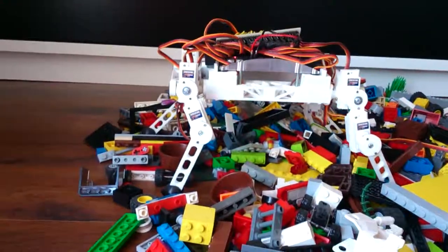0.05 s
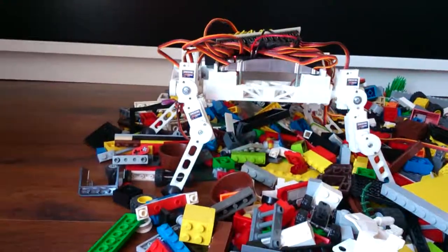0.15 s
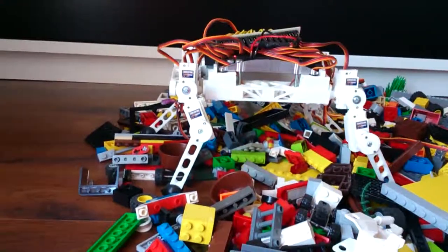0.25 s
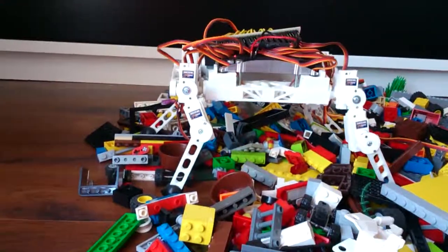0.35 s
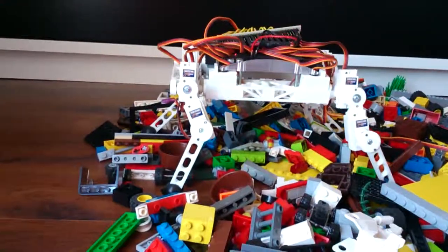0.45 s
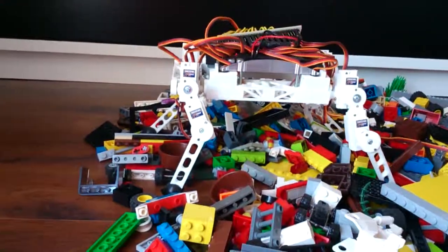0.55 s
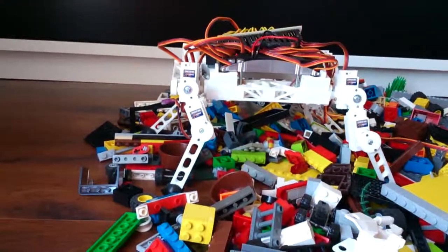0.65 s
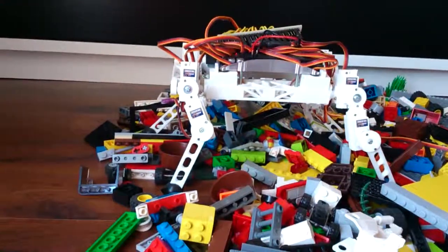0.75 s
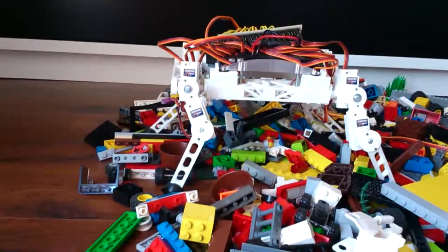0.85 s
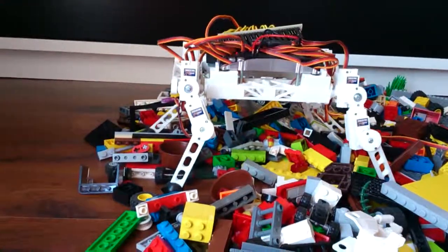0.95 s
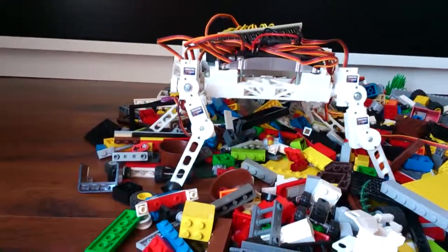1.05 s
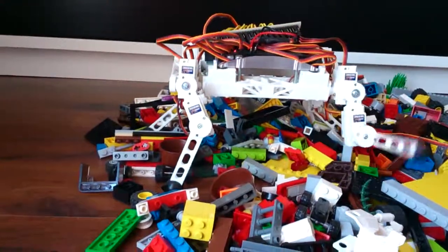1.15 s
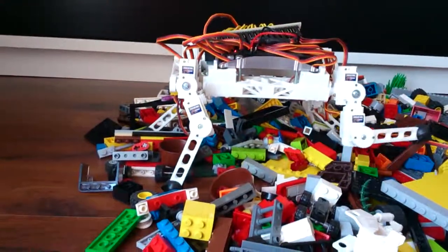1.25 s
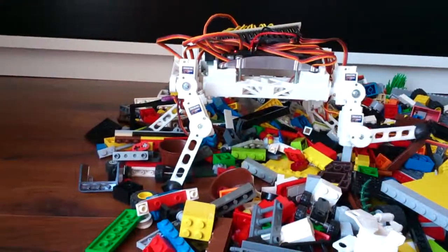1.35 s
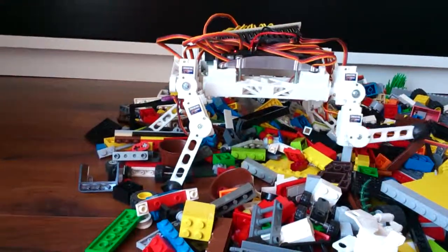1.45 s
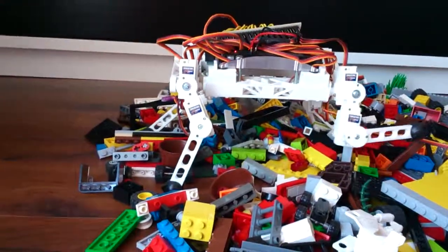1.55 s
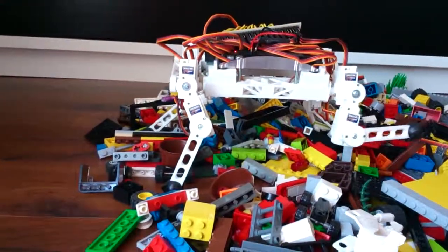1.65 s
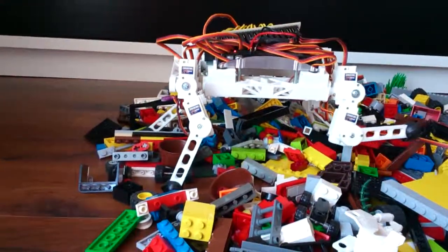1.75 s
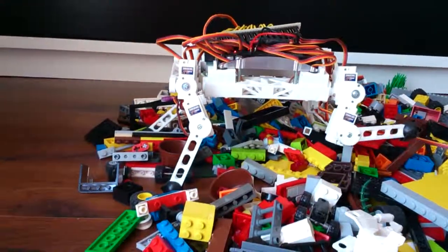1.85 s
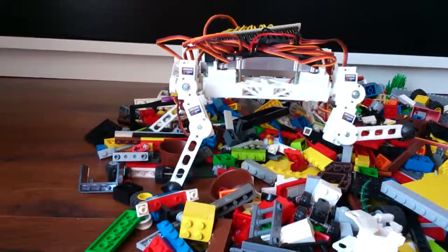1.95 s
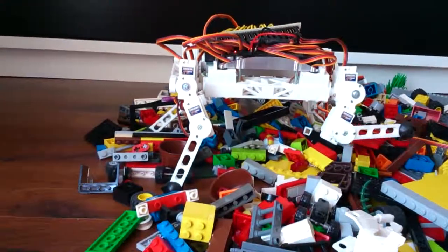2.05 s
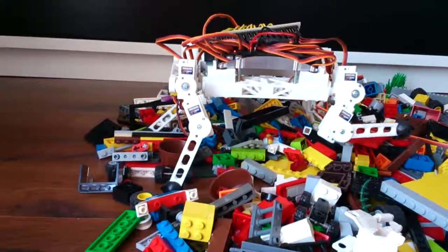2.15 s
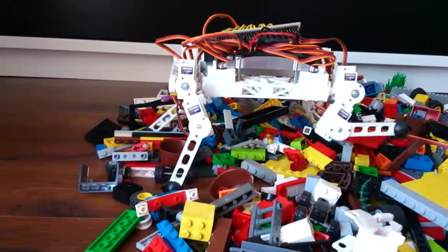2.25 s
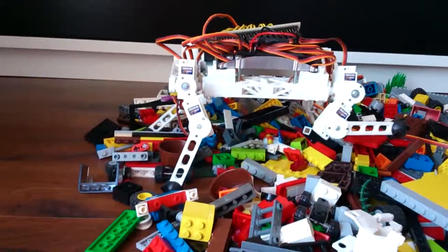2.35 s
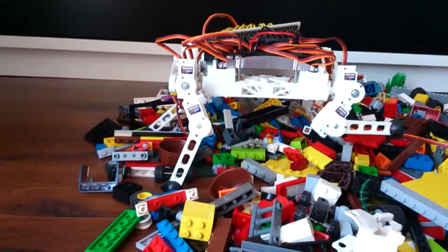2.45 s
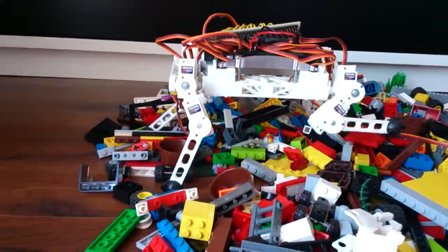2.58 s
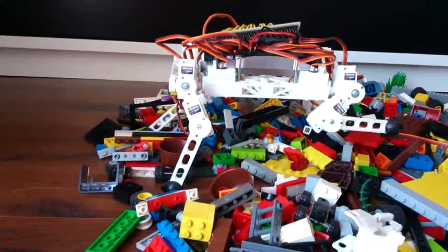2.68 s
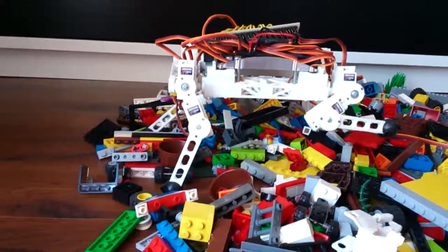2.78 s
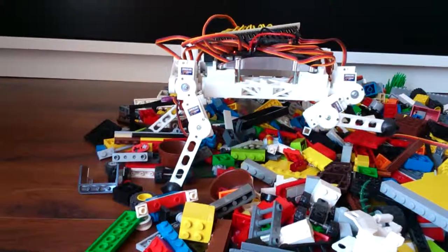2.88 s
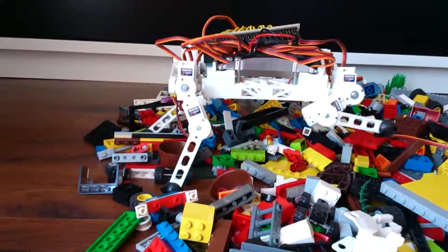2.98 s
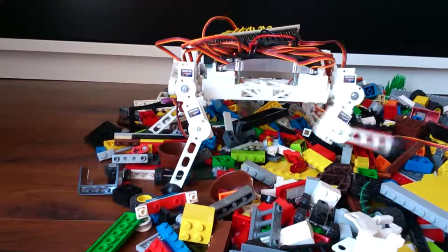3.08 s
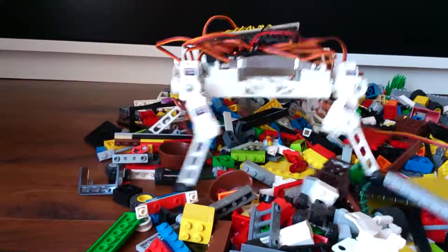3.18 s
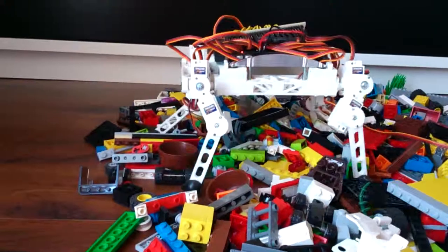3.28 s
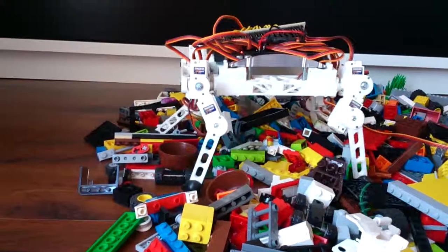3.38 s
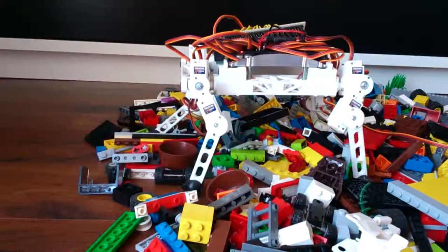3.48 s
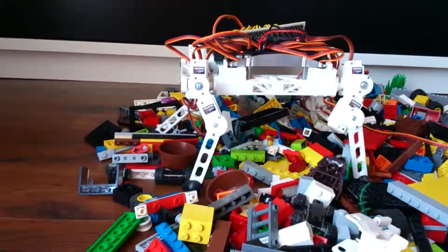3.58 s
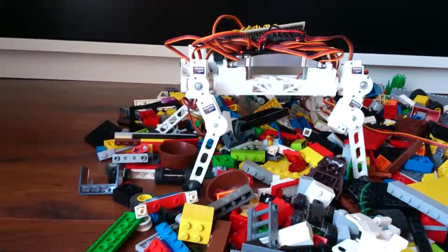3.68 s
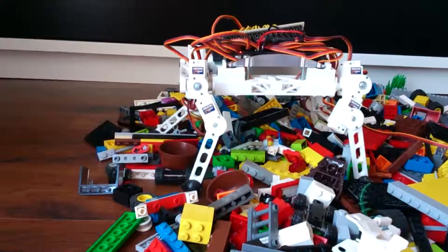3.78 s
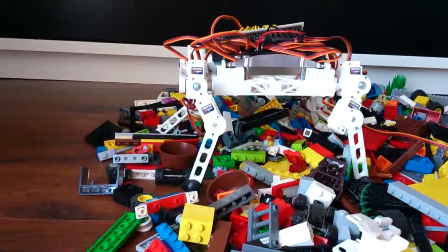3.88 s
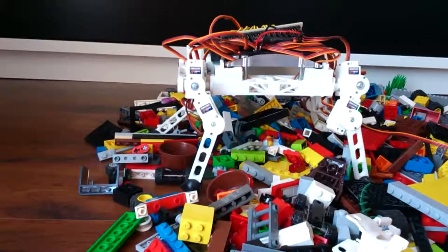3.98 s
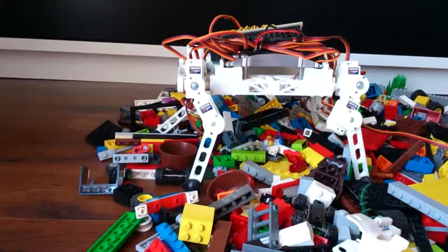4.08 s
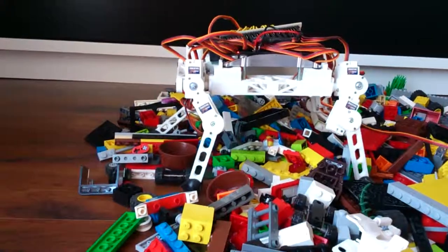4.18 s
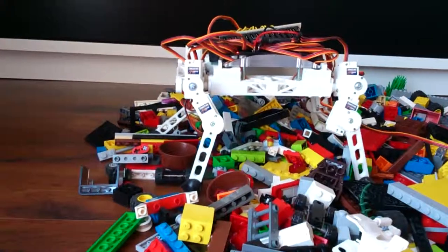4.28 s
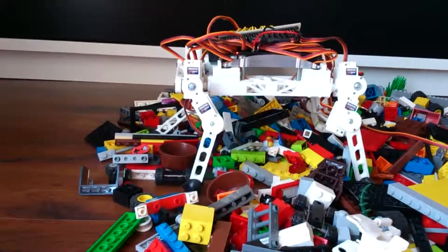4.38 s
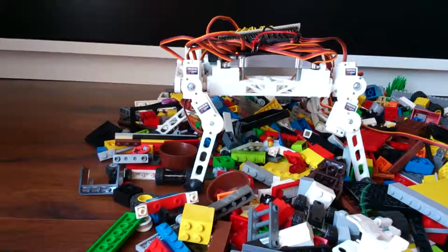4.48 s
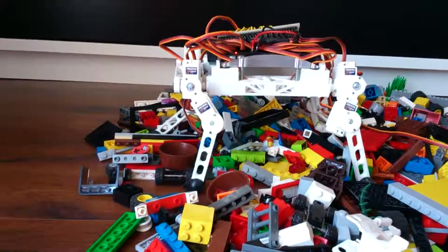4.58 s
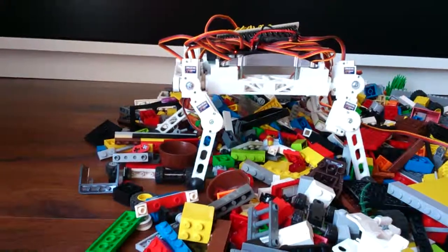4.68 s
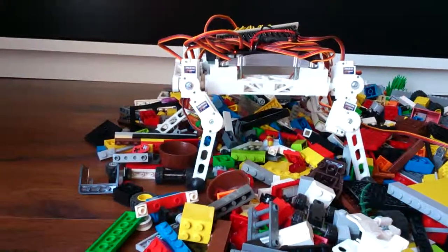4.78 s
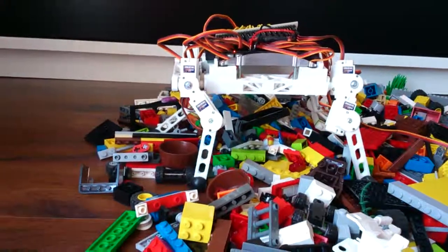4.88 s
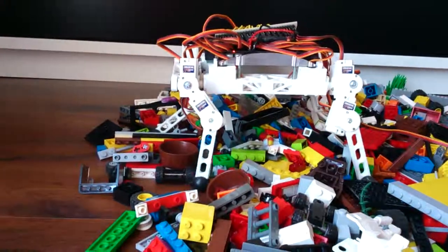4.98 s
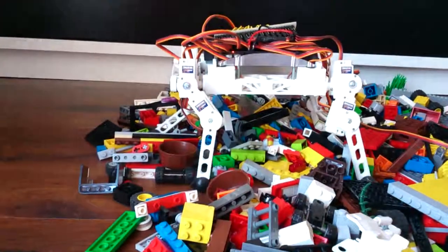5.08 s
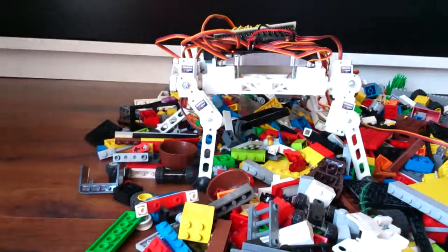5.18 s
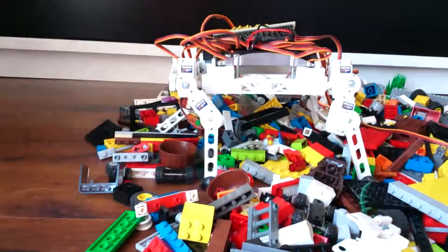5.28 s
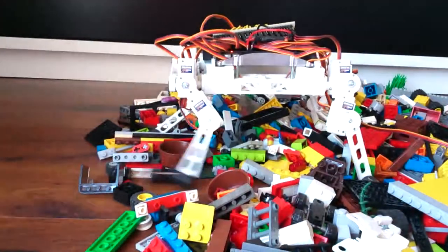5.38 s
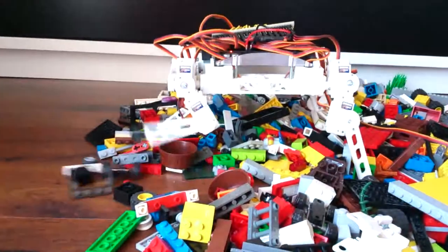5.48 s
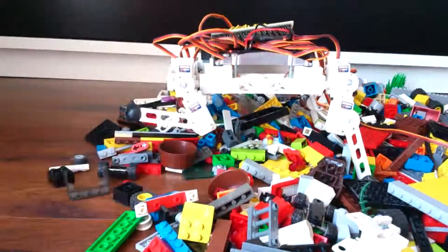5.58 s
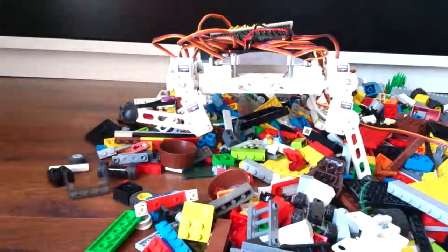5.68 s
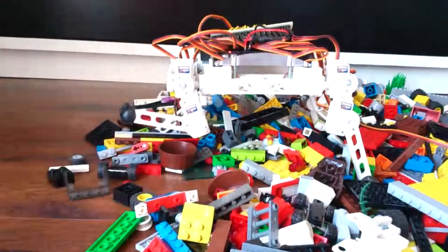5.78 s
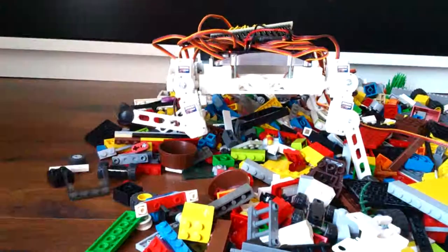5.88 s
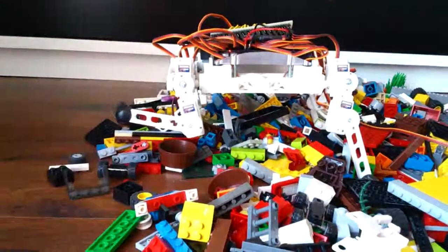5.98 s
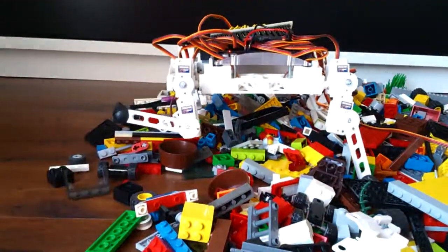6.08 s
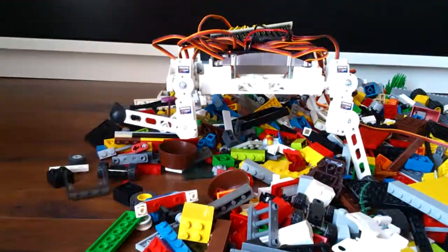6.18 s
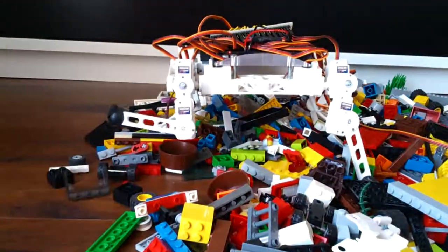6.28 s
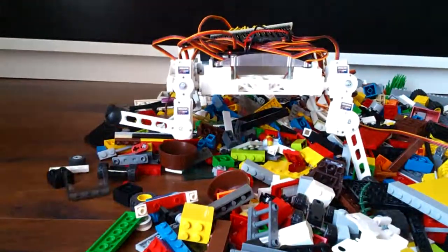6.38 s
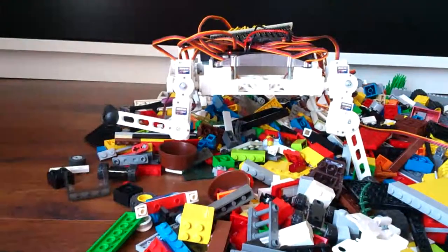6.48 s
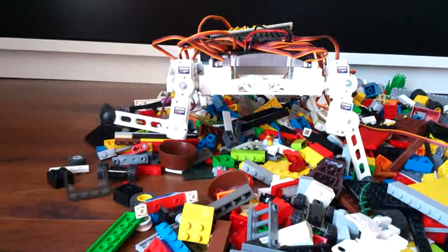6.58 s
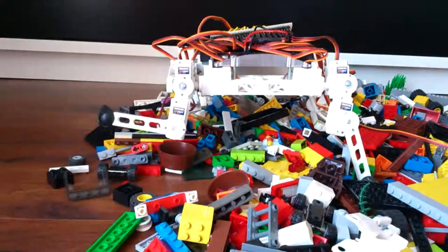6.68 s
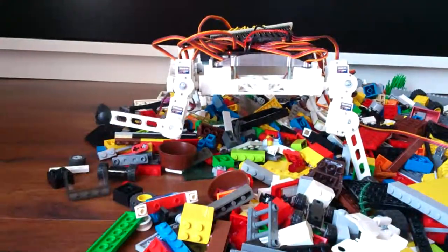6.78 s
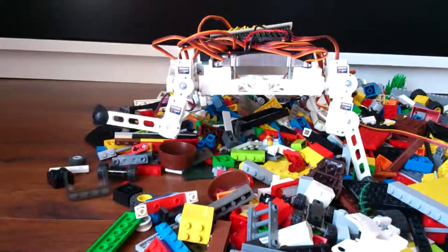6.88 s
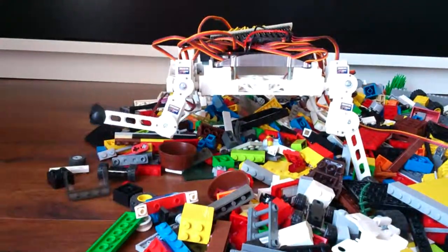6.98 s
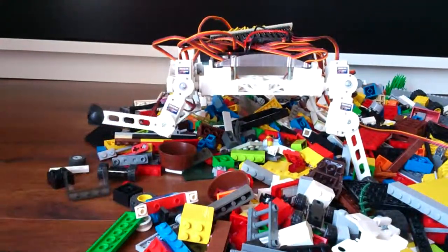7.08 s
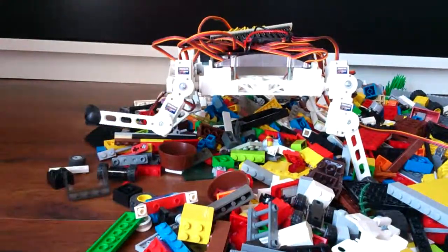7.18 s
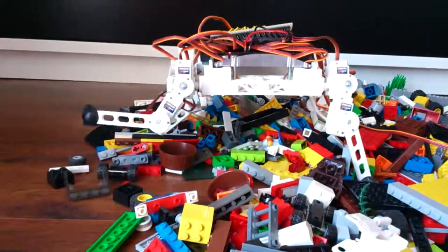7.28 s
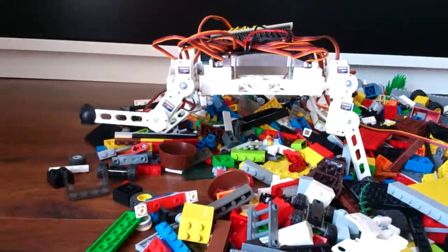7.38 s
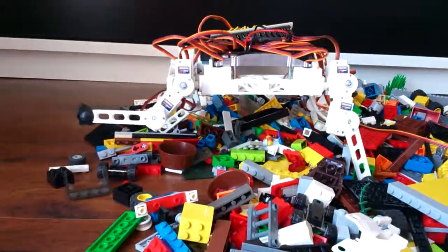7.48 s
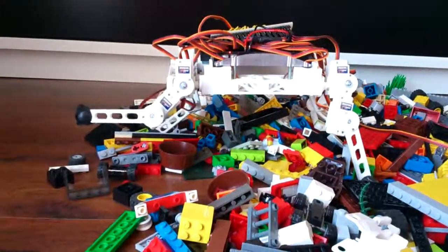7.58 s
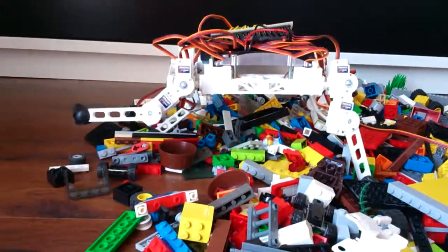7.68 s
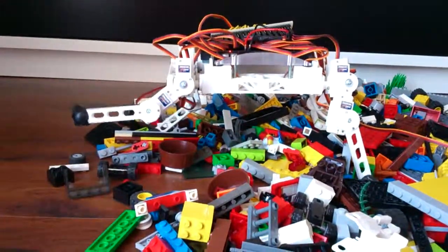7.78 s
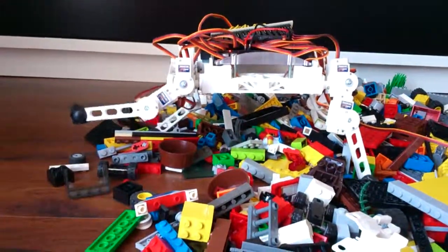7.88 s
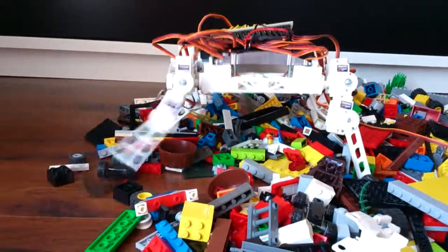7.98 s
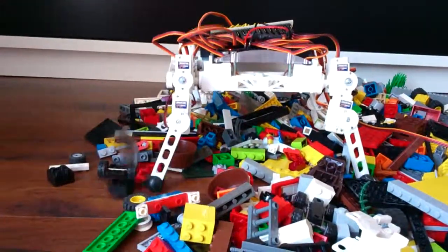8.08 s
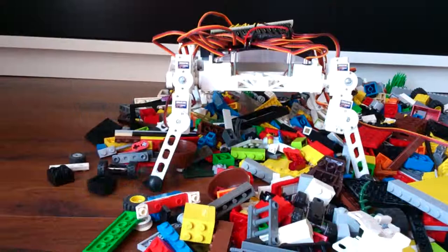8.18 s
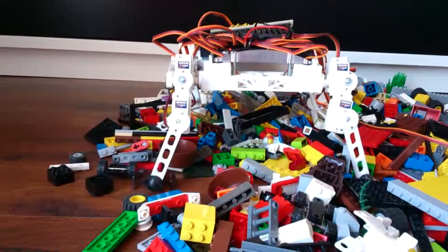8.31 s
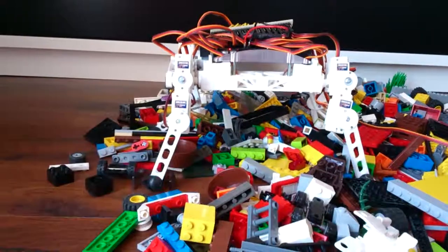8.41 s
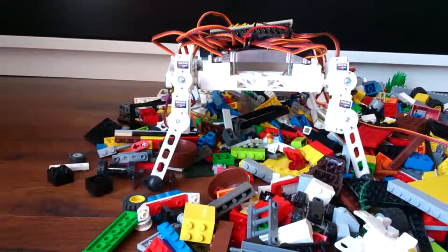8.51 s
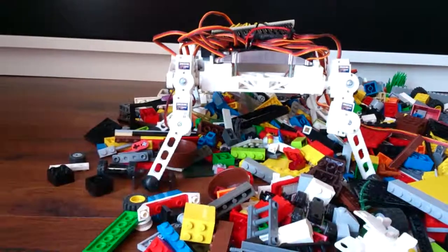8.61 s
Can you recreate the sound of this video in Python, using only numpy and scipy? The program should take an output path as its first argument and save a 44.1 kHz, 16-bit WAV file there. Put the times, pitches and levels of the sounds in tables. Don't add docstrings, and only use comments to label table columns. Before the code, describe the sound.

A small robot's servos whir in four short bursts, each followed by loose plastic bricks clattering, sliding and knocking on a wooden floor indoors.

```python
import sys
import numpy as np
from scipy import signal
from scipy.fft import rfft, irfft, next_fast_len
from scipy.io import wavfile
from scipy.ndimage import uniform_filter1d, map_coordinates

SR = 44100
rng = np.random.default_rng(int(sys.argv[2]) if len(sys.argv) > 2 else 0)


def dump(signal):
    limited = np.clip(np.atleast_2d(signal).T, -1, 1)
    pcm = np.round(limited * 32767).astype(np.int16)
    wavfile.write(sys.argv[1], SR, pcm)


def convert_level_to_amplitude(level_db):
    exponent = np.asarray(level_db, float) / 20
    return 10 ** exponent


N = 381465
DRIVE_HZ = 313.4
RIGHT_LEAD, LEFT_LEAD = 1, 6


def unit(x):
    return x / np.sqrt(np.mean(x ** 2) + 1e-20)


def along(points, hz):
    f, v = np.transpose(points)
    return np.interp(np.log(hz + 1), np.log(f + 1), v)


def gains(tables):
    t, total = np.arange(N) / SR, 0
    for rows in tables:
        s, *levels_db = np.transpose(rows)
        fade = np.clip(np.minimum(t - s[0], s[-1] - t) / 0.0046 + 1, 0, 1)
        total = np.maximum(total, fade * convert_level_to_amplitude([np.interp(t, s, db) for db in levels_db]))
    return total


def wobble(rate):
    points = rng.standard_normal(int(N * rate / SR) + 4)
    return map_coordinates(points, [np.arange(N) * rate / SR])


def filtered(x, response):
    m = next_fast_len(N + SR // 4)
    return irfft(rfft(x, m) * response(np.fft.rfftfreq(m, 1 / SR)), m)[..., :N]


def resonances(peaks):
    def response(f):
        total = 0
        for k, (hz, width, db) in enumerate(peaks):
            mode = 1j * f * width / (hz * hz - f * f + 1j * f * width)
            total = total + (-1) ** k * convert_level_to_amplitude(db) * mode
        return total
    return response


# (frequency [Hz], likeness [0-1])
LIKENESS = [(60, 0.39), (300, 0.83), (800, 0.38), (1400, 0.68), (2500, 0.14), (8000, 0.13)]


def spread(pair, response, lead):
    def mid_and_side(hz):
        turn = np.arccos(np.clip(along(LIKENESS, hz), -1, 1)) / 2
        return response(hz) * [np.cos(turn), np.sin(turn)]
    mid, side = filtered(pair, mid_and_side)
    return np.array([mid + side, np.roll(mid - side, round(lead))])


def arrive(pair, lead):
    off_boards = lead + 8
    right = 0.71 * np.roll(pair[1], lead) + 0.57 * np.roll(pair[1], off_boards)
    return np.array([pair[0], right])


def grains(per_second, scatter_db, smooth):
    hit = rng.random(N) < per_second / SR
    size = convert_level_to_amplitude(scatter_db * np.minimum(rng.exponential(size=N), 2))
    contact = hit * size * np.sign(rng.standard_normal((2, N)))
    return unit(contact) + smooth * rng.standard_normal((2, N))


def patchy(x, depth_db):
    hz, _, z = signal.stft(x, SR, nperseg=512)
    field = uniform_filter1d(rng.standard_normal(z.shape[1:]), size=2, axis=0)
    field = uniform_filter1d(field, size=10, axis=1)
    treble = np.clip(hz / 2500, 0, 1)[:, None]
    return signal.istft(z * convert_level_to_amplitude(depth_db * treble * unit(field)), nperseg=512)[1][:, :N]


# (frequency [Hz], level [dB per Hz])
HISS = [(15, -39), (25, -9), (108, -6), (439, -17), (1100, -19.5), (1230, -16.5), (1560, -22.5),
        (2910, -23.5), (4030, -16.5), (4740, -21.5), (6900, -17.5), (9300, -18), (10400, -27), (15300, -30),
        (16200, -40.5)]


def hiss():
    air = patchy(rng.standard_normal((2, N)), depth_db=3.8)
    colour = lambda hz: convert_level_to_amplitude(along(HISS, hz)) * (hz > 140)
    return convert_level_to_amplitude(-68 + 1.04 * wobble(2.118)) * unit(spread(air, colour, lead=4))


# (time [s], half-width [s], deep level [dB], boom
# level [dB])
SWELLS = [
    (0.05, 0.11, -90, -69.5),
    (1.35, 0.15, -76, -60.5),
    (2.95, 0.17, -67, -80),
    (3.25, 0.13, -63.5, -63.5),
    (3.47, 0.11, -63.5, -62),
    (5.62, 0.15, -84.5, -61),
    (7.0, .12, -75, -76),
    (8.07, 0.075, -68, -61),
    (8.18, .08, -61, -73),
    (8.37, 0.12, -75, -58.5),
]


def rumble_swells():
    t = np.arange(N) / SR
    power = convert_level_to_amplitude([-78 + 2.8 * wobble(2.7), -72.5 + 0.63 * wobble(2.5)]) ** 2
    for s, half_width, deep_db, boom_db in SWELLS:
        power = power + convert_level_to_amplitude([[deep_db], [boom_db]] - 6.5 * ((t - s) / half_width) ** 2) ** 2
    return np.sqrt(power)


def rumble():
    def band(centre_hz, width_hz):
        return unit(spread(rng.standard_normal((2, N)), resonances([(centre_hz, width_hz, 0)]), lead=4))
    deep, boom = rumble_swells()
    limits = lambda hz: 1 / (1 + (hz / 170) ** 4 + (38 / (hz + 1)) ** 8)
    return filtered(deep * band(48, 14) + boom * band(106, 60), limits)


# (time [s], level [dB])
WHINE = [(0, -81), (4.5, -81), (4.8, -100), (8.65, -100)]


def tones():
    whine = gains([WHINE])[0] * np.sqrt(2) * np.sin(2 * np.pi * 1213 * np.arange(N) / SR)
    hum_hz = 102 + 5 * wobble(8)
    hum = np.sin(2 * np.pi * np.cumsum(hum_hz) / SR)
    return whine + convert_level_to_amplitude(-76 + 4 * wobble(12)) * hum


def house():
    return hiss() + rumble() + tones()


# (multiple of the drive rate, level [dB])
BUZZ = [(2, -92), (3, -93), (4, -92), (5, -90), (6, -95), (10, -94), (11, -93), (13, -92), (14, -96),
        (17, -97), (20, -94), (21, -96), (22, -92), (23, -91), (25, -95), (26, -95), (28, -96), (30, -96)]


def drive_buzz():
    t, buzz = np.arange(N) / SR, np.zeros((2, N))
    for k, db in BUZZ:
        swell = convert_level_to_amplitude(db + 3.5 + 3.5 * wobble(3))
        side_shift = [[0], [k / 25]]
        turns = k * DRIVE_HZ * t + 0.07 * wobble(4.0) + rng.random() + side_shift
        buzz += swell * np.sin(2 * np.pi * turns)
    return buzz


# (start [s], length [s], level [dB], load on the leg [dB])
SERVO_RUNS = [
    (-.06, 0.134, -68.5, 20.5),
    (1.09, 0.12, -44, -5),
    (3.058, 0.088, -45, -0.5),
    (3.149, 0.27, -41.5, 1),
    (5.379, 0.055, -44.5, -9),
    (7.944, .034, -49.5, -2),
    (7.987, 0.037, -45, -20),
    (8.531, 0.047, -63.5, 19),
    (8.589, 0.043, -63, 18.5),
]


def runs():
    t, running, strained = np.arange(N) / SR, 0, 0
    for s, length, db, load_db in SERVO_RUNS:
        catch = np.clip((t - s) / 0.011, 0, 1)
        speeding = convert_level_to_amplitude(db - 8.5 * np.clip(1 - (t - s) / length, 0, 1))
        run_down = convert_level_to_amplitude(-20 * np.clip(t - s - length, 0, 1) / 0.0078)
        gain = catch * speeding * run_down
        running = running + gain
        strained = strained + gain * convert_level_to_amplitude(load_db)
    return running, strained


# (time [s], level [dB])
TWITCHES = [(.557, -73), (.93, -73), (1.95, -68), (2.33, -72), (2.5, -71.5), (6.65, -67), (7.005, -66),
            (7.26, -68.5), (7.43, -67), (7.79, -65)]
# (frequency [Hz], width [Hz], level [dB])
GEARBOX = [(8000, 2200, 2), (11000, 3200, 3), (14400, 9800, -5.5)]
# (frequency [Hz], width [Hz], level [dB])
LEG = [(4300, 7100, 0)]


def servos():
    t = np.arange(N) / SR
    throb = 1 + 0.2 * np.cos(2 * np.pi * DRIVE_HZ * t)
    teeth = throb * grains(4600, scatter_db=10.0, smooth=3.2)
    running, strained = runs()
    whir = unit(spread(teeth, resonances(GEARBOX), lead=5))
    strain = unit(spread(teeth, lambda hz: resonances(LEG)(hz) ** 2, lead=4.45))
    for s, db in TWITCHES:
        running = running + convert_level_to_amplitude(db - 2.8 * ((t - s) / 0.008) ** 2)
    return running * whir + convert_level_to_amplitude(-17.0) * strained * strain + drive_buzz()


# (frequency [Hz], width [Hz], level [dB])
BOARDS = [(701, 316, 1.5), (1016, 170, 4.5), (375, 170, -6.5), (1297, 310, -2)]


def floorboards(hz):
    return resonances(BOARDS)(hz)


# (time [s], level [dB], main mode [Hz], second mode [Hz], crunch length [ms])
SETTLING = [(0.0383, -51, 4800, 8740, 3.8), (0.37, -51, 2820, 2000, 9), (0.681, -52.5, 3940, 5430, 6),
            (0.7238, -50, 3960, 2500, 2.4), (0.7319, -48, 2440, 3900, 5), (0.739, -49, 2240, 1420, 2.4),
            (0.799, -51, 1770, 3750, 8.5), (4.0544, -55.5, 3960, 5510, 2.3),
            (5.022, -42.5, 4260, 2300, 3.1), (5.027, -45, 4300, 2240, 3), (7.7862, -57, 11240, 5440, 5.9),
            (8.6371, -51, 4130, 2150, 13)]
RIGHT_LEG = [(1.0466, -42, 6650, 4140, 1.9), (1.0668, -43, 1080, 1940, 2.3),
             (1.1072, -36.5, 8530, 1980, 0.7), (1.1163, -30.5, 4480, 3170, 7.6),
             (1.1528, -26.5, 2370, 4260, 1.4), (1.1553, -21.5, 3010, 1570, 1.5),
             (1.1568, -20, 2630, 4040, 2.8), (1.2835, -15, 6560, 3230, 1.6), (1.3116, -25, 5300, 2054, 1.7),
             (3.1875, -31, 1873, 5620, 2), (3.2, -26, 2020, 1260, 1.85), (3.2105, -27, 2740, 5150, 2.3),
             (3.2128, -19, 5250, 9100, 1.9), (3.2155, -22, 8970, 3810, 2.1), (3.226, -28, 9010, 6500, 8),
             (3.245, -31.5, 7900, 5210, 4), (3.2631, -21, 2350, 5470, 3.1), (3.2719, -19, 2280, 3114, 1),
             (3.2762, -25.5, 5810, 2024, 3.5), (3.2807, -23, 5150, 2150, 3.7),
             (3.286, -24, 5080, 2080, 3.6), (3.292, -29.5, 7360, 5380, 3.4), (3.298, -24, 6450, 2820, 3.8),
             (3.304, -37, 6540, 4130, 3.7), (3.3245, -27.5, 8770, 2446, 3.7), (3.3275, -17, 2364, 6980, 4),
             (3.3314, -19, 9600, 2154, 3.55), (3.335, -23, 7540, 3040, 2), (3.3436, -29.5, 8790, 2425, 3.4),
             (3.353, -29.5, 8870, 4540, 2.5), (3.359, -35.5, 8060, 1974, 1.8),
             (3.3677, -32.5, 8700, 2125, 3)]
LEFT_LEG = [(5.4385, -27.5, 8100, 11330, 3.2), (5.448, -38, 7680, 11200, 3.4),
            (5.4705, -32, 10020, 4010, 3.6), (5.5196, -25.5, 10280, 4090, 7.3),
            (5.532, -26.5, 9930, 3970, 5), (5.541, -23, 7700, 11440, 7), (5.554, -29.5, 8140, 3400, 4),
            (5.5665, -36.5, 9930, 6770, 8), (5.585, -40.5, 6850, 9300, 4), (5.594, -42, 9440, 5730, 4),
            (5.6305, -49, 7670, 3880, 4), (5.6859, -49.5, 5300, 7490, 4.6),
            (7.9955, -35.5, 4570, 3100, 3.1), (7.997, -38.5, 3360, 4630, 6),
            (8.0007, -33.5, 3420, 5600, 1.1), (8.0445, -29.5, 7600, 4170, 3.8),
            (8.0538, -27, 5240, 9230, 3), (8.0598, -24.5, 6030, 4000, 2), (8.0732, -28.5, 9880, 6020, 1.8),
            (8.091, -30, 3120, 4570, 8), (8.1075, -40, 6750, 4200, 4), (8.118, -42, 8400, 1980, 3),
            (8.1265, -37.5, 8610, 2580, 2.5), (8.1398, -33.5, 6890, 4180, 1),
            (8.1462, -24, 6290, 4440, 1.9), (8.149, -20.5, 6420, 4450, 2.8), (8.1738, -25.5, 7600, 5130, 2),
            (8.1795, -24.5, 7190, 4700, 2), (8.186, -23, 8700, 5520, 1.8), (8.2972, -15, 4770, 3340, 0.85)]
# (time [s], level [dB], centre [Hz], crunch length [ms], ring [dB])
HOLLOW_HITS = [(5.426, -30, 8000, 1.2, -14), (5.4572, -18, 9700, 2.5, -10), (5.478, -21, 8200, 5, -9),
               (5.4902, -30.5, 7720, 3, -5), (5.5064, -26, 6480, 4.8, -8), (8.0305, -15, 7180, 1.2, -20),
               (8.1606, -28, 7000, 1.8, -8), (8.1703, -20.5, 4550, 1.5, -10),
               (8.1963, -8.5, 5940, 3, -12.5), (8.2105, -24.5, 7000, 2, -5.5),
               (8.2164, -21.5, 6570, 2, -16), (8.224, -28.5, 7520, 2, -3.5), (8.2359, -16, 8800, 2.3, -5.5),
               (8.2606, -20, 6450, 1.5, -6.5), (8.263, -24, 7430, 1.8, -11), (8.2644, -23, 6020, 1.5, -18),
               (8.2695, -29, 7170, 2, -4), (8.275, -35, 7400, 3, -7.5), (8.2881, -41, 6030, 1.7, -16),
               (8.3003, -15.5, 6010, 1.8, -9), (8.3028, -19, 7000, 2, -10.5), (8.3151, -24, 6000, 1.5, -13),
               (8.3194, -21, 5900, 2, -10), (8.3352, -27.5, 5000, 2.4, -13), (8.3458, -26.5, 7330, 3, -13),
               (8.351, -29.5, 7000, 3, -10.5), (8.361, -39.5, 7280, 1.8, -2),
               (8.3657, -36, 7200, 1.8, -4.5)]


def contacts():
    def knock(hz, more_db):
        return -16 + more_db - 6.5 * np.log2(max(hz, 2200) / 4000)
    first_step = [r for r in RIGHT_LEG if r[0] < 2]
    second_step = [r for r in RIGHT_LEG if r[0] > 2]
    groups = [(SETTLING, -2.5, LEFT_LEAD), (first_step, -7, RIGHT_LEAD),
              (second_step, -4, RIGHT_LEAD), (LEFT_LEG, -0.5, LEFT_LEAD)]
    faint_ring_db = -29
    rows = []
    for table, more_db, lead in groups:
        for s, db, a, b, ms in table:
            rows.append((s, db, (a, b), ms, knock(np.sqrt(a * b), more_db), faint_ring_db, lead))
    for s, db, hz, ms, ring_db in HOLLOW_HITS:
        rows.append((s, db, (hz * 1.3, hz / 1.4), ms, knock(hz, -2), ring_db, LEFT_LEAD))
    return rows


# (main level [dB], second level [dB])
MODE_DB = (3.5, 1.5)


def brick_crunch(modes_hz, ms, lead):
    t, f = np.arange(1024) / SR, np.fft.rfftfreq(2048, 1 / SR)
    centre_hz = np.sqrt(np.prod(modes_hz))
    noise = rng.standard_normal((3, 1024))
    lumps = convert_level_to_amplitude(0.7 * rng.standard_normal(64).repeat(16))
    crunch = (noise[:2] + 0.67 * noise[2]) * lumps * convert_level_to_amplitude(-7 * t * 1000 / max(ms, .3))
    crunch *= 1 - np.exp(-(t * 1000 + 0.039) / max(0.11 * ms - 1, .02))
    crunch[:, 2] += 16 * np.exp(-ms / 1.28)
    soft = 1 / (1 + 1j * f / (1.07 * max(modes_hz))) ** 2
    soft *= (1j * f / (0.45 * min(modes_hz) + 1j * f)) ** 2
    main = resonances([(hz, 480, db) for hz, db in zip(modes_hz, MODE_DB)])(f)
    lesser = resonances([(centre_hz * convert_level_to_amplitude(6 * z), 450, -9) for z in rng.standard_normal(4)])(f)
    snap = (1 + lesser) * resonances([(centre_hz, 1.3 * centre_hz, 0)])(f)
    crunch = arrive(irfft(rfft(crunch, 2048) * soft * (main + snap)), lead)
    body = crunch[:, :int(45 + 25 * ms)]
    return crunch / np.sqrt(np.mean(body ** 2, axis=1, keepdims=True))


# (frequency [Hz], level [dB], time to fall 60 dB [s])
HOLLOW = [(3746, 3.5, 0.039), (5044, 3.5, 0.12), (5560, -2.5, .12), (5884, -6, 0.07), (6350, -7.5, 0.059),
          (7080, 4.5, 0.07), (7616, 8, 0.18), (7600, -1, 0.094), (7470, -4.5, 0.09), (8650, 3, 0.044),
          (9905, 4, .06), (10050, 2.5, 0.18), (10450, -3.5, 0.07), (11700, -12.5, 0.067)]
LANDINGS_S = [5.432, 5.474, 5.496, 5.512, 8.034, 8.168, 8.194, 8.223, 8.289, 8.356, 8.372]


def hollow_ring(s, centre_hz):
    t = np.arange(8192) / SR
    hz, level_db, t60 = np.transpose(HOLLOW)[:, :, None]
    waver = np.cumsum(0.055 * rng.standard_normal((len(hz), len(t))), axis=1)
    near_db = level_db - 15 * np.log2(hz / centre_hz) ** 2
    fall_db = 60 * t / np.clip(t60, .02, .25)
    size = convert_level_to_amplitude(near_db + rng.normal(0, 3, (2, len(hz), 1)) - fall_db)
    phase = 2 * np.pi * (hz * t + rng.random((2, len(hz), 1))) + waver
    ring = (size * np.sin(phase)).sum(1)
    landing = min([m for m in LANDINGS_S if m > s] + [s + .1])
    return ring * convert_level_to_amplitude(-20 * np.clip(t + s - landing, 0, 1) / .006)


def clacks():
    crunches, rings = np.zeros((2, 2, N + SR))
    knocks = np.zeros(N)
    for s, db, modes_hz, ms, knock_db, ring_db, lead in contacts():
        at = round(s * SR)
        ring = hollow_ring(s, np.sqrt(np.prod(modes_hz)))
        crunches[:, at:at + 2048] += convert_level_to_amplitude(db - 7.0) * brick_crunch(modes_hz, ms, lead)
        rings[:, at:at + 8192] += convert_level_to_amplitude(db - 6.5 + ring_db) * ring
        knocks[at] = convert_level_to_amplitude(db + knock_db + 28)
    return crunches[:, :N] + filtered(knocks, floorboards), rings[:, :N]


# (frequency [Hz], time to fall 60 dB [s])
ROOM = [(300, 0.7), (2000, 0.35), (6000, 0.34), (14000, 0.22)]


def room(x):
    wall = filtered(x.mean(0), resonances([(7000, 7000, 0.028)]))
    out = np.roll(wall, round(.0137 * SR)) * convert_level_to_amplitude([[-17], [-9]])
    for a in range(0, N, SR // 4):
        hz, t, z = signal.stft(rng.standard_normal((2, SR // 2)), SR, nperseg=256)
        fall = convert_level_to_amplitude(-60 * t / along(ROOM, hz)[:, None])
        tail = signal.istft(z * fall, SR, nperseg=256)[1]
        wet = signal.fftconvolve(x[:, a:a + SR // 4], tail / np.linalg.norm(tail[0]), axes=1)
        out[:, a + 150:][:, :wet.shape[1]] += convert_level_to_amplitude(-9.5) * wet[:, :N - a - 150]
    return out


# (time [s], level [dB])
HEAP = [
    [(1.07, -58), (1.1, -56), (1.125, -35.5), (1.15, -52), (1.17, -37), (1.2, -49), (1.24, -46),
     (1.265, -47), (1.281, -53)],
    [(1.286, -33.5), (1.3, -46), (1.32, -36.5), (1.34, -50.5), (1.38, -55)],
    [(3.17, -56), (3.2, -42), (3.22, -30), (3.25, -36), (3.27, -32), (3.315, -36.5), (3.345, -26.5),
     (3.375, -42.5), (3.41, -78)],
    [(5.41, -58), (5.452, -41), (5.462, -35), (5.5, -35.5), (5.55, -38), (5.58, -46.5), (5.62, -54),
     (5.7, -56), (5.75, -73)],
    [(7.998, -41.5), (8.025, -54), (8.035, -35.5), (8.05, -37), (8.065, -31), (8.09, -34), (8.11, -41),
     (8.135, -47), (8.144, -46)],
    [(8.146, -25.5), (8.157, -44.5), (8.17, -30.5), (8.22, -36.5), (8.25, -36), (8.29, -59), (8.31, -40),
     (8.35, -39), (8.385, -52)],
]
# (drumming boards [dB], dull scrape [dB])
HEAP_MIX = [(-15.5, 1), (-18, -8.5), (-10.5, -1), (-15, -7), (-10.5, -5), (-12.5, -3.5)]


def stir():
    grown = lambda db, grows: -35 + grows * (db + 35)
    shoves = []
    for rows, (drum_db, scrape_db) in zip(HEAP, HEAP_MIX):
        shoves.append([(s, grown(db, 0.75) + drum_db, grown(db, 0.99) + scrape_db, db) for s, db in rows])
    return gains(shoves)


# (frequency [Hz], level [dB per Hz])
SCRAPE = [(600, -29.5), (1200, -5.5), (2250, -5.5), (3000, -12), (4000, -23.5), (6000, -4.5), (9000, -48)]
# (frequency [Hz], level [dB per Hz])
RATTLE = [(1760, -34.5), (3000, 0), (4600, -5), (6260, -9.5), (7560, 3), (9400, 0), (10100, -6.5),
          (10900, -19.5), (16000, -29)]


def heap():
    drum, scrape, rattle = stir()
    low = lambda hz: floorboards(hz) / (1 + (hz / 1300) ** 4)
    boards = spread(grains(800, scatter_db=6.5, smooth=0.95), low, lead=3)
    dull = grains(2100, scatter_db=5.5, smooth=0.97)
    dull = spread(dull, lambda hz: convert_level_to_amplitude(along(SCRAPE, hz)), lead=4)
    bright = patchy(grains(2100, scatter_db=0.5, smooth=0.21), depth_db=4)
    bright = spread(bright, lambda hz: convert_level_to_amplitude(along(RATTLE, hz)), lead=6)
    dull = dull * convert_level_to_amplitude(3 * wobble(90))
    bright = bright * convert_level_to_amplitude(3 * wobble(120))
    return drum * convert_level_to_amplitude(-4.5) * unit(boards) + scrape * convert_level_to_amplitude(-8.0) * unit(dull) + rattle * convert_level_to_amplitude(-4.5) * unit(bright)


# (time [s], level [dB])
STUDS = [(1.1655, -29), (1.171, -32), (1.1793, -30), (1.192, -27), (1.2013, -28), (1.2107, -27),
         (1.2185, -27), (1.2264, -28), (1.2335, -32), (1.2402, -32), (1.2458, -33), (1.2518, -33),
         (1.257, -36), (1.2625, -36), (1.2717, -41)]
# (frequency [Hz], width [Hz], level [dB])
BEAM = [(2014, 1100, 2), (3600, 1600, 3.5), (5300, 2000, 3)]


def studs():
    blows, t = np.zeros((2, N)), np.arange(256) / SR
    for s, db in STUDS:
        shudder = .17 * rng.standard_normal((2, len(t))) * np.exp(-t / .0015)
        blows[:, round(s * SR):][:, :len(t)] += convert_level_to_amplitude(db + 19) * (shudder + (t == 0))
    return filtered(arrive(blows, RIGHT_LEAD), lambda hz: resonances(BEAM)(hz) / (1 + 1j * hz / 7500) ** 2)


# (time [s], level [dB], pitch [Hz], time to fall 60 dB [s])
THUDS = [
    (3.244, -27, 620, .04),
    (3.281, -27, 600, .05),
    (3.33, -21, 369, .025),
    (5.437, -30, 750, 0.035),
    (5.481, -27.5, 727, 0.054),
    (5.518, -23, 686, 0.058),
    (5.541, -30, 755, 0.041),
    (7.996, -13.5, 595, 0.017),
    (8.197, -28, 297, 0.02),
]


def thuds():
    out, t = np.zeros(N), np.arange(2048) / SR
    for s, db, hz, t60 in THUDS:
        push = convert_level_to_amplitude(db - 20.5 - 60 * t / t60) * np.sin(2 * np.pi * hz * t)
        out[round(s * SR):][:len(t)] += push
    return out


def scene():
    background = house()
    whir = servos()
    knocks, ring = clacks()
    robot = whir + knocks + heap() + studs() + thuds()
    return robot + ring + room(robot + convert_level_to_amplitude(-9) * ring) + background


def top_cut(x):
    return signal.sosfilt(signal.butter(12, 15830, fs=SR, output="sos"), x)


# (frequency [Hz], left over right [dB])
MICROPHONES = [(60, 2), (700, 3), (2400, 3), (4400, 4), (8100, -5.5), (15000, 2.5)]


def record(dry):
    def colour(hz):
        return convert_level_to_amplitude(along(MICROPHONES, hz) * [[.5], [-.5]]) / (1 + (hz / 15800) ** 90)
    return top_cut(filtered(dry, colour))


dry = scene()
out = record(dry)
dump(out)
```